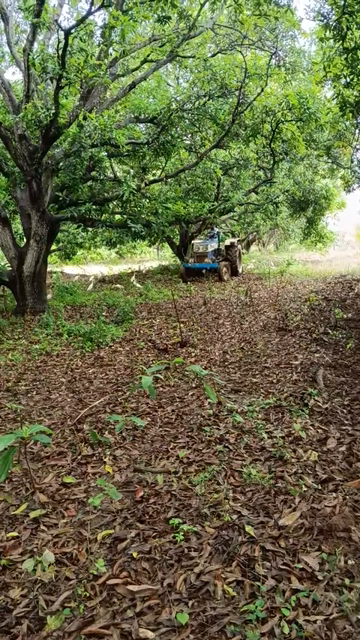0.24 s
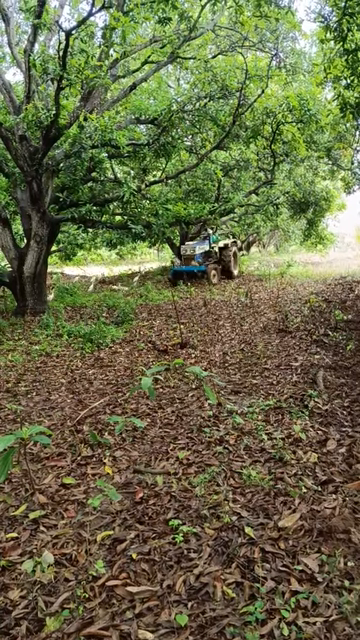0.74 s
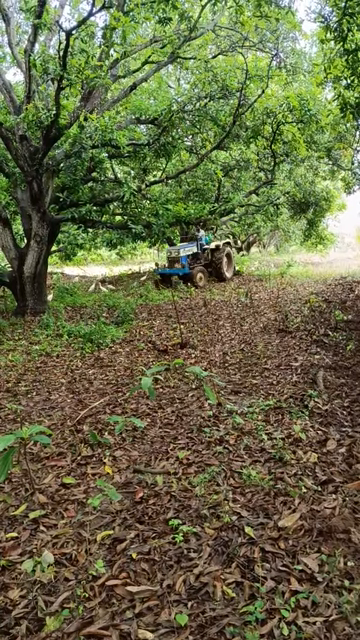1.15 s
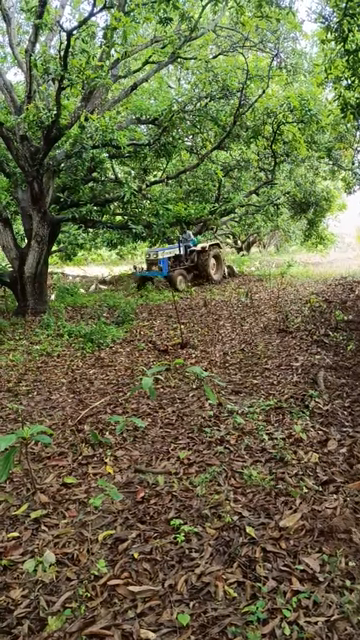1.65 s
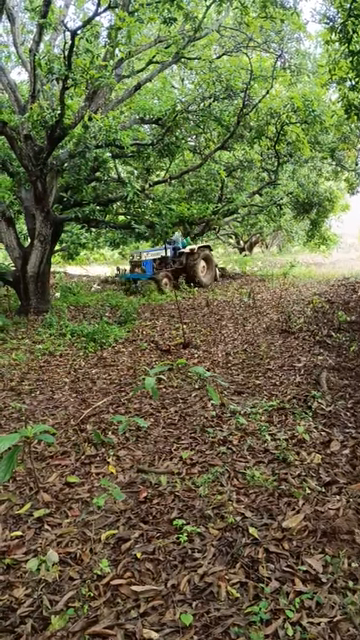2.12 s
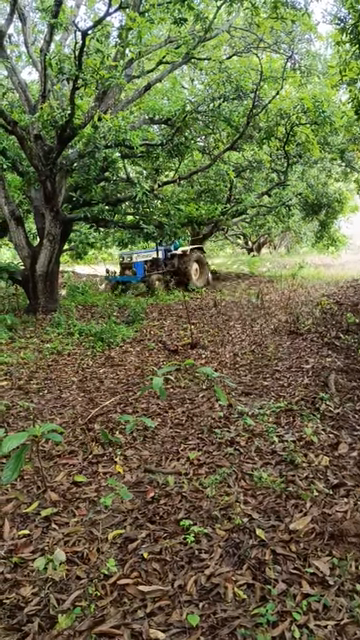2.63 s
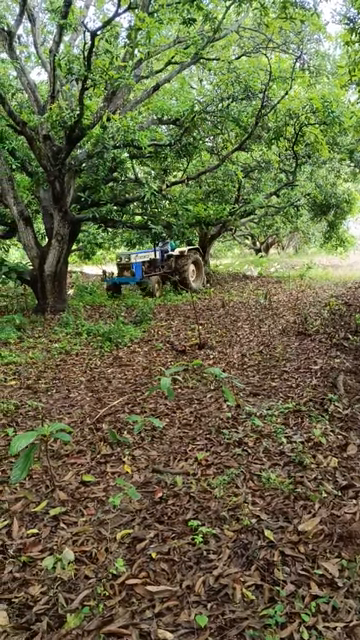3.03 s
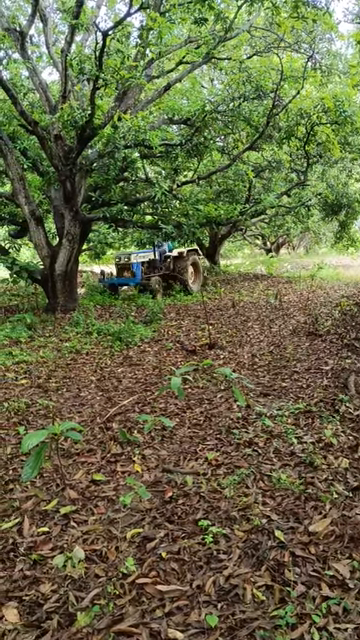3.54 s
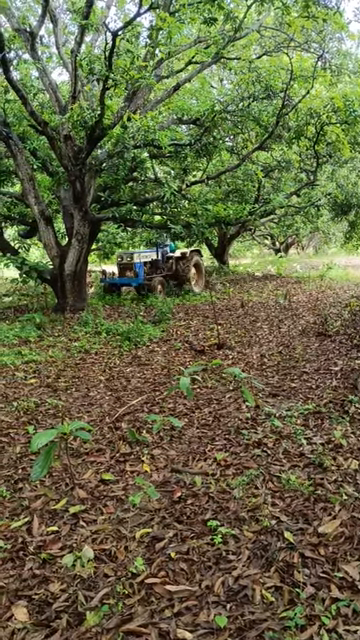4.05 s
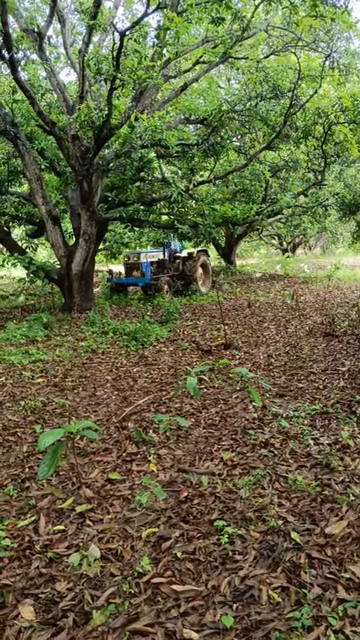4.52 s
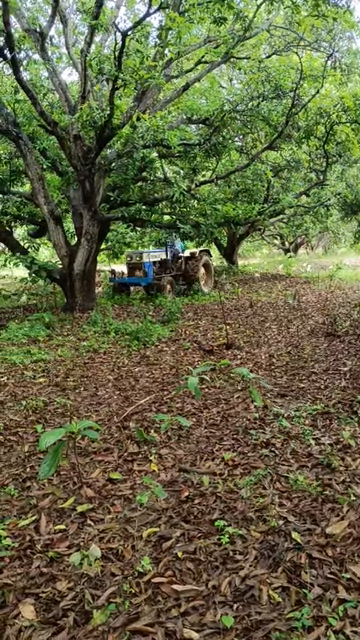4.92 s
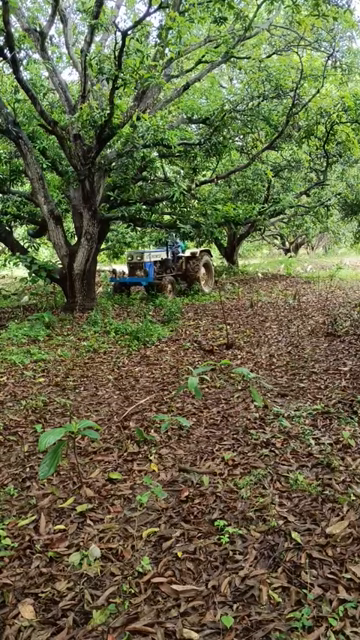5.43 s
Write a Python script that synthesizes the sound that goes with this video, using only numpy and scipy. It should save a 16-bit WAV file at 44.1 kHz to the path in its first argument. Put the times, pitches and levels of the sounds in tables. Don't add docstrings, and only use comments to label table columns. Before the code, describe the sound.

A diesel tractor chugs under load through an orchard, engine knocking and surging, discs scraping soil and clanking on stones, then turning away duller.

```python
import sys
import numpy as np
from scipy import signal
from scipy.fft import rfft, irfft, next_fast_len
from scipy.io import wavfile
from scipy.ndimage import uniform_filter1d

SR = 44100
rng = np.random.default_rng(int(sys.argv[2]) if len(sys.argv) > 2 else 0)


def rack_gain(trim_db):
    fader = np.asarray(trim_db, float)
    return 10 ** (fader / 20)


def materialize(psi):
    bounded = np.clip(np.atleast_2d(psi).T, -1, 1)
    quanta = np.round(bounded * 32767).astype(np.int16)
    wavfile.write(sys.argv[1], SR, quanta)


N = 250047
T = np.arange(N) / SR
TICKS = np.arange(0, N / SR, .004)
FAST = next_fast_len(N)


def columns(table):
    s, *values = np.transpose(table)
    return [np.interp(T, s, v) for v in values]


def unit(x):
    return x / np.sqrt(np.mean(x ** 2))


def along(points, size):
    hz, value = np.transpose(points)
    bin_hz = np.arange(size // 2 + 1) * SR / size
    return np.interp(np.log(bin_hz + 1), np.log(hz), value)


def colour(x, points):
    gain = rack_gain(along(points, size=FAST))
    return unit(irfft(rfft(x, FAST) * gain, FAST)[..., :N])


def walk(rate):
    k = int(SR / rate)
    steps = np.repeat(rng.standard_normal(N // k + 1), k)
    return unit(uniform_filter1d(uniform_filter1d(steps, k), k)[:N])


def ring(x, modes, drift_db):
    total = 0
    for k, (hz, width, db) in enumerate(modes):
        mode = signal.lfilter(*signal.iirpeak(hz, hz / width, SR), x) / np.sqrt(width)
        total = total + (-1) ** k * rack_gain(db + drift_db * walk(5.787)) * mode
    return unit(total)


# time in seconds, firing rate in Hz.
FIRING_RATE = [(0.0, 31.03), (0.101, 30.27), (0.331, 24.58), (0.482, 24.05), (0.686, 28.06), (0.902, 31.37),
               (1.148, 31.53), (1.298, 32.98), (1.94, 33.01), (2.03, 32.66), (3.692, 32.43), (3.823, 36.45),
               (3.978, 34.01), (4.064, 35.94), (4.386, 36.08), (4.588, 35.31), (5.418, 35.45),
               (5.67, 34.54)]


def firing():
    hz = columns(FIRING_RATE)[0]
    return hz, np.cumsum(hz) / SR + .70


# start in seconds, length in seconds, exhaust in dB, tinwork rattle in dB, scrape in dB.
GOVERNOR_SURGES = [(0.01, 0.26, -18, -19.5, -30.5), (0.216, 0.91, -21, -23, -30),
                   (0.555, 0.46, -21, -24.5, -30), (0.687, 0.33, -19, -33, -33.5),
                   (0.843, 0.26, -37, -22.5, -34.5), (1.096, 0.15, -23.5, -25.5, -37),
                   (1.178, 0.306, -20.5, -30, -39), (1.54, 0.14, -19.5, -27.5, -39.5),
                   (1.744, 0.18, -20, -29, -40.5), (1.95, 0.2, -20.5, -30, -41.5),
                   (2.172, 0.21, -21, -27.5, -39), (2.437, 0.14, -18.5, -26, -36),
                   (2.669, 0.15, -19, -28.5, -33), (2.903, 0.23, -19, -28.5, -38.5),
                   (3.135, 0.36, -19.5, -31.5, -40), (3.513, 0.18, -17, -24, -32.5),
                   (3.749, 0.13, -17, -27, -36.5), (3.867, 0.27, -45, -44, -50),
                   (4.008, 0.387, -20.5, -45.5, -65), (4.44, 0.09, -24, -52, -70),
                   (4.55, 6.7, -23, -46, -61)]


def surging(column, lag_s, rise_db, sag_db, curve, idle_db):
    rows = np.transpose(GOVERNOR_SURGES)[..., None]
    start_s, length_s = rows[:2]
    since = TICKS - start_s - lag_s
    sag = sag_db * np.abs(since / length_s) ** curve
    each_db = rows[column] - np.where(since > 0, sag, -rise_db * since)
    power = rack_gain(2 * idle_db) + np.sum(rack_gain(2 * each_db), axis=0)
    return np.interp(T, TICKS, 10 * np.log10(power))


# lag in seconds, rise in dB per second,
# sag in dB over the surge, sag curve as an exponent, idle level in dB.
EXHAUST_SURGE = (0, 176, 6, 3.2, -60)
# frequency in Hz, level in dB.
STACK_LUGGING = [(24, -30), (48, -13), (73, 2.7), (122, 3), (146, -6), (170, -2.5), (197, -18), (255, -23)]
STACK_FACING = [(29, -32), (58, -5.5), (88, 1.5), (118, -2.5), (145, -2.5), (176, 1.9), (212, -10.5),
                (258, -28.5)]
STACK_SIDE_ON = [(33, -39), (65, -4.5), (98, 1.5), (130, -2.5), (163, -17), (196, -25.5), (228, -15),
                 (272, -34)]
STACK_AWAY = [(35, -27), (71, -9), (106, 0.1), (142, -17.5), (177, -11.5), (212, -16), (248, -24.5),
              (298, -44)]
# time in seconds, view as a number (0 lugging, 1 facing, 2 side on, 3 away).
STACK_TURN = [
    (.2, 1),
    (.36, 0),
    (.54, 0),
    (.7, 1),
    (.83, 1),
    (1.05, 1.7),
    (1.8, 2),
    (3.65, 2),
    (4.1, 3),
]
# time in seconds, lag in seconds, span over which the lag builds in Hz.
ORDER_LAG = [(.9, .021, 160), (1.1, .0143, 160), (3.9, .0143, 160), (3.97, .0213, 62)]


def exhaust(hz, cycles):
    level_db = surging(2, *EXHAUST_SURGE)
    turn = np.interp(TICKS, *np.transpose(STACK_TURN))
    heard_hz = np.log(np.outer(np.arange(1, 11), np.interp(TICKS, T, hz)))
    sizes_db = 0
    for k, view in enumerate((STACK_LUGGING, STACK_FACING, STACK_SIDE_ON, STACK_AWAY)):
        at, db = np.transpose(view)
        nearness = np.maximum(1 - abs(turn - k), 0)
        sizes_db = sizes_db + nearness * np.interp(heard_hz, np.log(at), db, right=-60)
    sizes = rack_gain(sizes_db)
    sizes /= np.sqrt(np.sum(sizes ** 2, axis=0))
    uneven = 1 + rack_gain(-22) * np.cos(np.pi * cycles + 2 * walk(3))
    hunting = cycles - .011 * (level_db - uniform_filter1d(level_db, SR // 3))
    lag_s, span_hz = columns(ORDER_LAG)
    silencer_hz = 118
    drone = 0
    for order, size in enumerate(sizes, 1):
        late = lag_s * np.clip(order * hz - silencer_hz, 0, span_hz) - .43
        shake = .025 * order * walk(14)
        level = np.interp(T, TICKS, size) * rack_gain(level_db + .6 * walk(9))
        drone = drone + level * np.cos(2 * np.pi * (order * hunting - late) + shake)
    return np.sqrt(2) * drone * uneven


# time in seconds, strength in dB over the rest.
HARD_KNOCKS = [(.035, 3), (.07, 3), (.36, 4), (.48, 1.5), (1.105, 5), (1.135, -2.5), (1.167, -1.5),
               (1.26, -1.5), (1.805, -1.5), (2.2, -1.5), (1.535, -1), (1.565, 2), (1.745, 1), (1.775, 1),
               (1.93, 5), (1.96, 5), (2.415, 4), (3.215, 7.5), (3.49, 7), (3.52, 1.5), (3.585, 3),
               (3.737, 5), (3.766, 6)]
# time in seconds, lead gained in cycles.
BLOCK_LEAD = [(1.0, 0), (1.9, .07), (3.8, .15)]


def blows(cycles, scatter_db):
    since = cycles + 1 - .635 + columns(BLOCK_LEAD)[0]
    strength_db = scatter_db * rng.standard_normal(400)
    for s, db in HARD_KNOCKS:
        strength_db[int(since[int(s * SR)])] = db
    return since % 1, rack_gain(strength_db)[since.astype(int)]


def knocks(since, strength, decay, steady):
    return (steady + strength * np.exp(-since / decay)) * rng.standard_normal((3, N))


# frequency in Hz, width in Hz, level in dB.
BLOCK_MODES = [(660, 34, -3.5), (873.4, 26, -0.5), (1195, 76, 3.5), (1349, 47, 5.5)]
# frequency in Hz, width in Hz, level in dB.
TINWORK_MODES = [(1765, 126, -6.5), (2201, 31, -1), (2392, 136, 1.5), (3030, 210, -5.5)]
# frequency in Hz, width in Hz, level in dB.
RASP_MODES = [(2783, 120, -0.5), (3045, 110, 0.5), (3414, 120, -1), (3782, 130, -1.5), (4650, 200, -19)]
# frequency in Hz, width in Hz, level in dB.
FRONT_MODES = [(1376, 27, 0), (1828, 48, -0.5), (987, 87, -9)]
# frequency in Hz, width in Hz, level in dB.
SUMP_MODES = [(687, 20, -2), (868, 31, -2.5), (2220, 87, 9)]
# time in seconds, front in dB and flank in dB against the rattle.
FRONT_AND_FLANK = [(0.1, -19.5, -26), (.8, -10.5, -33), (1.3, -21, -19), (2.0, -15, -11.5), (3.3, -19, -10),
                   (3.75, -28, -3.5)]
# frequency in Hz, density in dB per Hz.
SCRAPE_COLOUR = [(2470, -25), (4200, 1.5), (4510, -5), (5100, -6.5), (6040, -9), (6800, -15.5), (8090, -8),
                 (9160, -13), (10100, -11.5), (15300, -29)]
# frequency in Hz, density in dB per Hz.
WASH_COLOUR = [(250, -56), (420, -18.5), (585, -5), (640, -6.5), (690, -2.5), (990, -9.5), (1170, -3.5),
               (1580, -7), (2370, -3.5), (4740, -18.5), (5670, -20), (9610, -26), (12000, -28.5),
               (15300, -35)]
# lag in seconds, rise in dB per second,
# sag in dB over the surge, sag curve as an exponent, idle level in dB.
RATTLE_SURGE = (0.0245, 208, 24.5, 3, -53)
SCRAPE_SURGE = (0.04, 159, 18, 3, -57.5)


def clatter(cycles):
    rattle_db = surging(3, *RATTLE_SURGE)
    scrape_db = surging(4, *SCRAPE_SURGE)
    blow = blows(cycles, scatter_db=1.5)
    block = ring(knocks(*blow, decay=.18, steady=.1), BLOCK_MODES, drift_db=1.8)
    tin = ring(knocks(*blow, decay=.17, steady=.22), TINWORK_MODES, drift_db=1.8)
    rasp = ring(knocks(*blow, decay=.2, steady=.75) * rack_gain(1.8 * walk(70)), RASP_MODES, drift_db=2.2)
    scrape = colour(knocks(*blow, decay=.083, steady=7.3) * rack_gain(1.2 * walk(60)), SCRAPE_COLOUR)
    wash = colour(knocks(*blow, decay=.058, steady=2.3), WASH_COLOUR)
    is_firing = np.diff(blow[0], prepend=0) < 0
    fired = np.maximum.accumulate(np.where(is_firing, np.arange(N), 0))
    rattle_db = uniform_filter1d(rattle_db[np.minimum(fired + int(.014 * SR), N - 1)], size=60)
    metal = (rack_gain(-6.5) * tin + rack_gain(-1.5) * rasp) * rack_gain(rattle_db)
    block_db = 0.26 * rattle_db - 33.5 + rack_gain(3.5) * walk(15)
    wash_db = 0.084 * rattle_db - 34.5 + walk(14)
    faces = 0
    for modes, db in zip((FRONT_MODES, SUMP_MODES), columns(FRONT_AND_FLANK)):
        face = ring(knocks(*blow, decay=.25, steady=.15), modes, drift_db=1.5)
        faces = faces + face * rack_gain(rattle_db + db)
    return block * rack_gain(block_db) + faces + metal + scrape * rack_gain(scrape_db + 2.0) + wash * rack_gain(wash_db)


# frequency in Hz, density in dB per Hz.
SOIL_COLOUR = [(25, -8), (50, 1), (120, 5), (200, 6), (320, -1), (400, -6), (500, -41), (650, -32)]
# time in seconds, churn in dB.
BITE_DEPTH = [(0, -45.5), (.5, -53.5), (1.0, -43.5), (1.7, -41.5), (2.45, -37), (3.9, -43), (4.1, -50),
              (5.67, -47.5)]
# time in seconds, level in dB.
EARTH_HEAVES = [(.125, -48), (.87, -56), (.99, -45), (1.1, -36.5), (1.86, -45), (2.14, -51), (2.69, -36),
                (2.945, -35), (3.17, -44.5), (3.58, -48), (4.01, -41)]


def soil():
    heave_s = 0.019
    heaves = sum(rack_gain(db) * np.exp(-((TICKS - s) / heave_s) ** 2) for s, db in EARTH_HEAVES)
    swell = rack_gain(columns(BITE_DEPTH)[0] + 2.1 * walk(11)) + np.interp(T, TICKS, heaves)
    return colour(rng.standard_normal((3, N)), SOIL_COLOUR) * rack_gain(5.5) * swell


# time in seconds, peak in dB, pitch in Hz, length in seconds.
CLOD_THUMPS = [
    (1.102, -42, 334, 0.019),
    (2.685, -25, 300, 0.027),
    (2.69, -34, 360, 0.045),
    (2.946, -26.5, 308, 0.015),
    (3.167, -27.5, 267, 0.018),
]


def clods():
    thumps = 0
    for s, db, hz, length_s in CLOD_THUMPS:
        since = T - s
        tone = np.sin(2 * np.pi * hz * since * (1 + 0.65 * since))
        thumps = thumps + rack_gain(db) * np.exp(-(since / length_s) ** 2) * tone
    return thumps


# time in seconds, peak in dB, frequency in
# Hz, width in Hz, decay in seconds.
STONE_STRIKES = [
    (2.654, -16.5, 1210, 200, 0.032),
    (2.656, -20.5, 1940, 700, 0.057),
    (2.662, -15.5, 3550, 700, 0.053),
    (2.685, -22, 2960, 400, 0.085),
    (2.657, -21.5, 6100, 2900, 0.1),
    (2.658, -24, 9500, 2500, 0.05),
    (3.52, -40, 512, 25, 0.1),
    (2.185, -30, 3600, 70, .12),
    (2.41, -29, 3380, 70, .14),
    (2.94, -29, 2890, 90, .13),
]


def strikes():
    hits, grit = 0, rng.standard_normal((3, N))
    for s, db, hz, width, decay in STONE_STRIKES:
        since = np.maximum(T - s, 0)
        attack = np.minimum(since / (0.11 * decay), 1)
        shape = attack * np.exp(-since / decay) * rack_gain(2.5 * walk(90))
        hits = hits + rack_gain(db) * shape * ring(grit, [(hz, width, 0)], drift_db=0.5)
    return signal.lfilter(*signal.butter(2, 10500, fs=SR), hits)


# time in seconds, level in dB, pitch in Hz, length in seconds.
BIRD_CHIRPS = [
    (4.31, -52, 5900, .03),
    (4.985, -50, 6000, .02),
    (5.02, -51, 5700, .02),
    (5.24, -49, 5570, .03),
]


def bird():
    warble = 2.5 * np.sin(900 * T)
    song = 0
    for s, db, hz, length_s in BIRD_CHIRPS:
        since = T - s
        song = song + rack_gain(db) * np.exp(-(since / length_s) ** 2) * np.sin(2 * np.pi * hz * since + warble)
    return song


# frequency in Hz, level in dB.
TWIG_TONES = [(2500, -21), (3200, -23), (5100, -32)]


def twig():
    since = np.maximum(T - 5.0625, 0)
    decay = np.exp(-since / .0018)
    return sum(rack_gain(db) * decay * np.sin(2 * np.pi * hz * since) for hz, db in TWIG_TONES)


# frequency in Hz, direct share from 0 to 1.
DIRECT_SHARE = [(60, 0.98), (200, 1), (300, 0.71), (450, 0.27), (700, 0.81), (1050, 0), (1300, 0.85),
                (1650, 0), (2300, 0.98), (3300, 0.29), (4300, 0.08), (15000, 0.15)]
# frequency in Hz, left minus right in dB.
PORT_BALANCE = [(200, 3), (450, -4), (800, 0.5), (1050, -2.5), (1600, -1), (2800, 7.5), (3800, 4.5),
                (4800, -1.5), (15000, -1.5)]


def ports(far):
    left_lag_s = 0.00013
    share = np.clip(along(DIRECT_SHARE, size=FAST), 0, 1)
    lag = np.exp(-2j * np.pi * np.arange(FAST // 2 + 1) * SR / FAST * left_lag_s)
    direct, *scatter = rfft(far, FAST)
    straight = np.sqrt(share) * direct * np.array([lag, np.ones_like(lag)])
    heard = straight + np.sqrt(1 - share) * np.array(scatter)
    balance = rack_gain(np.outer([.5, -.5], along(PORT_BALANCE, size=FAST)))
    return irfft(heard * balance, FAST)[:, :N]


def scene():
    hz, cycles = firing()
    drone = exhaust(hz, cycles)
    far = rack_gain(3.0) * clatter(cycles) + soil() + strikes()
    return drone + ports(far) + clods() + bird() + twig()


def low_pass(x):
    return signal.sosfilt(signal.butter(12, 15470, fs=SR, output="sos"), x)


def record(dry):
    rounded = np.tanh(.8 * dry) / .8
    return low_pass(rounded)


dry = scene()
out = record(dry)
materialize(out)
```